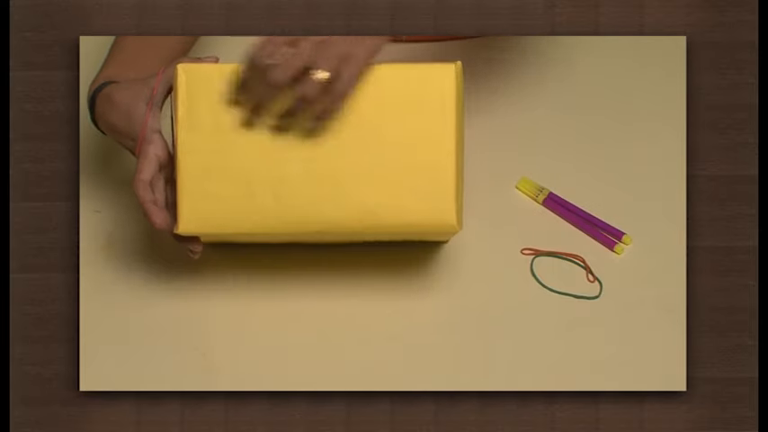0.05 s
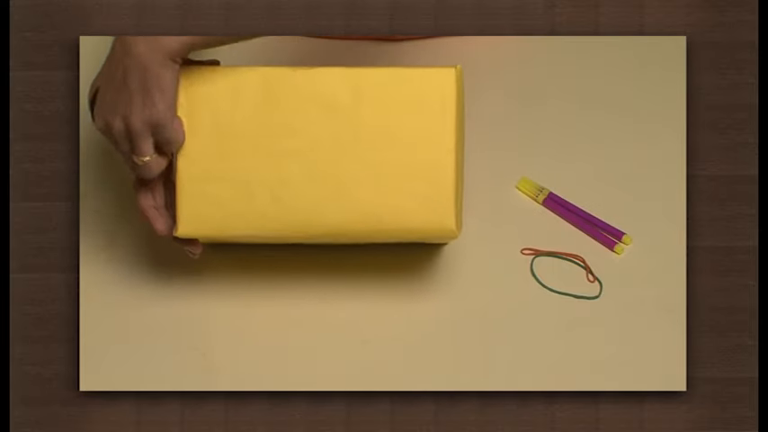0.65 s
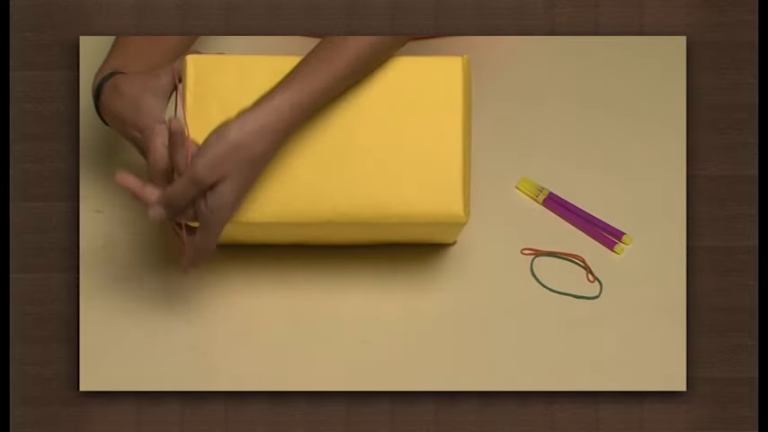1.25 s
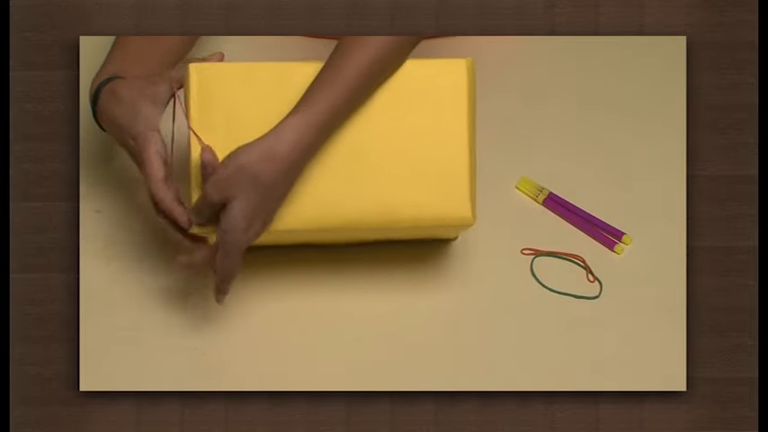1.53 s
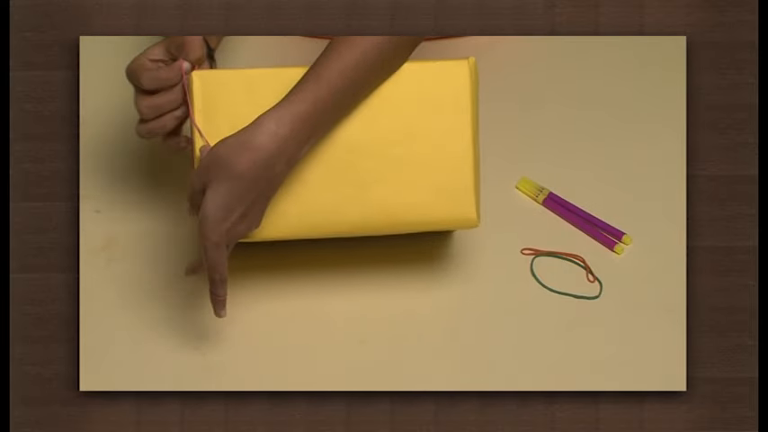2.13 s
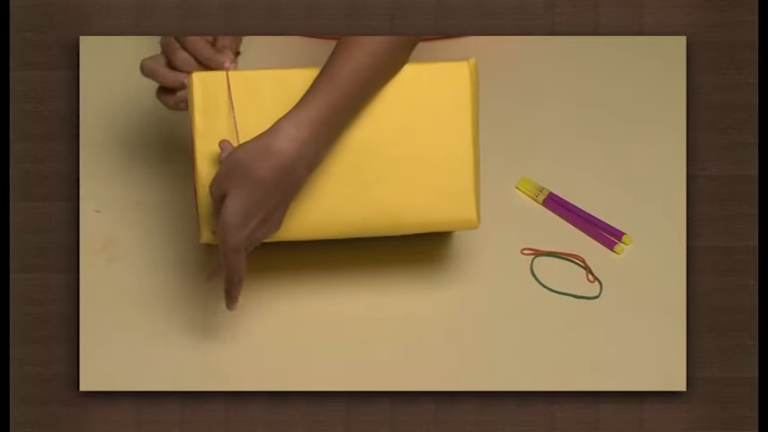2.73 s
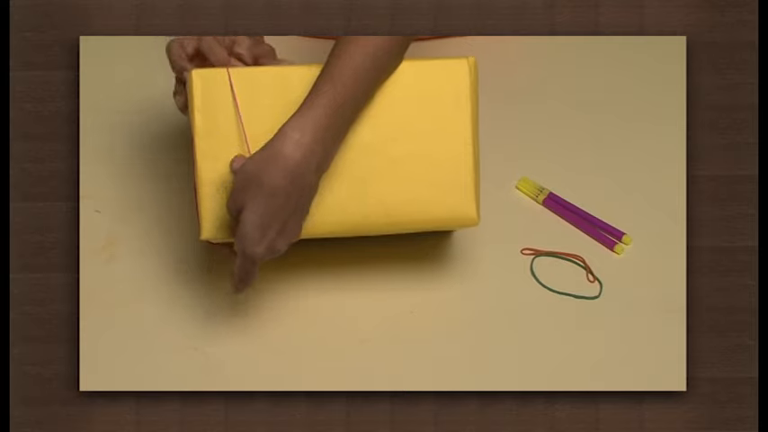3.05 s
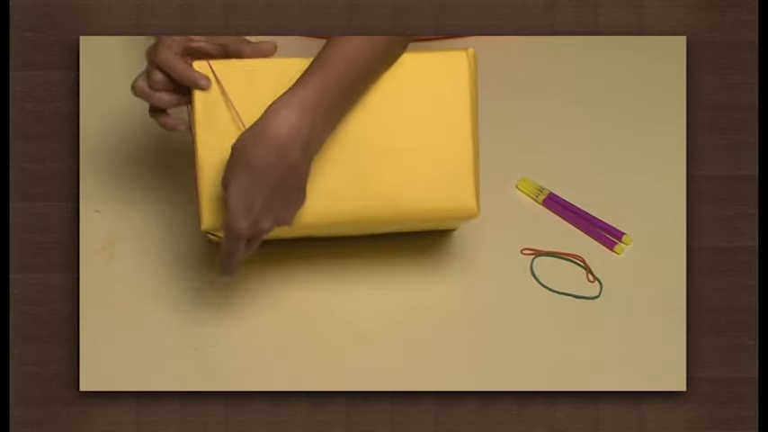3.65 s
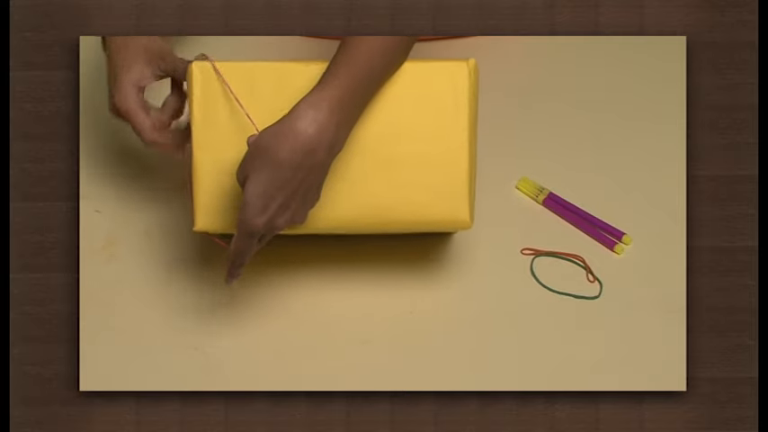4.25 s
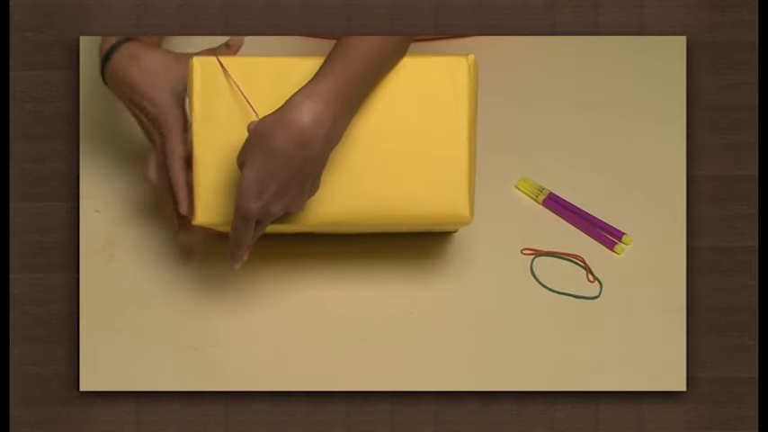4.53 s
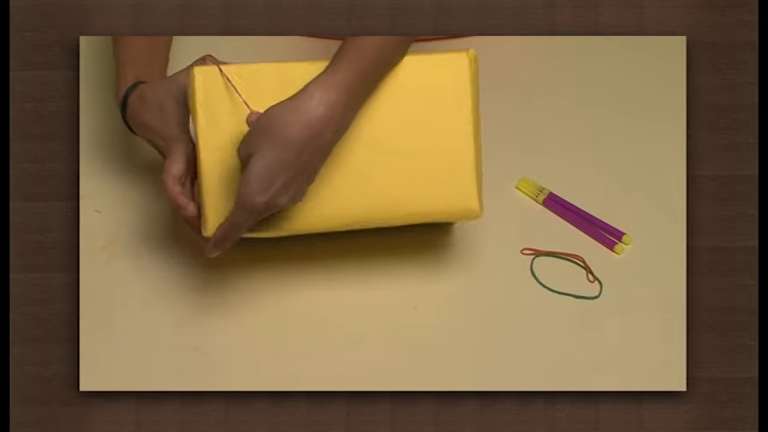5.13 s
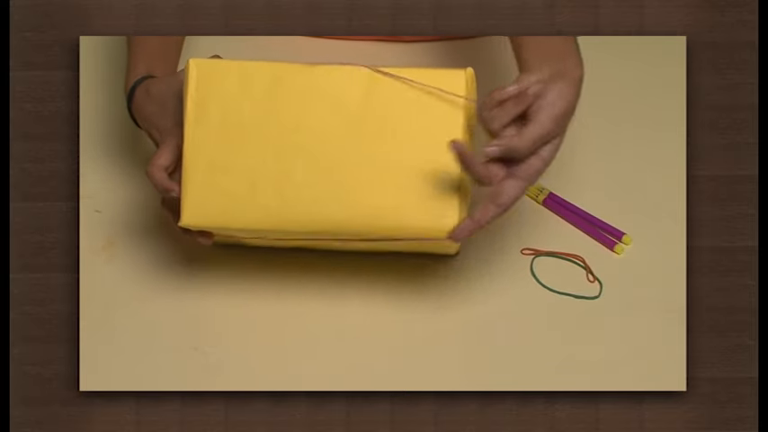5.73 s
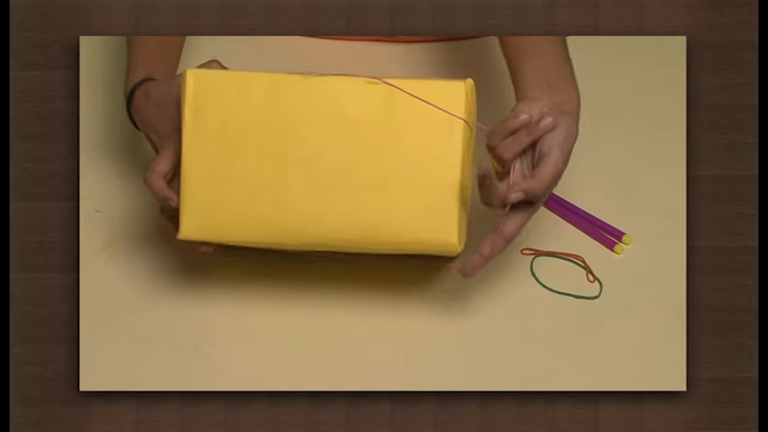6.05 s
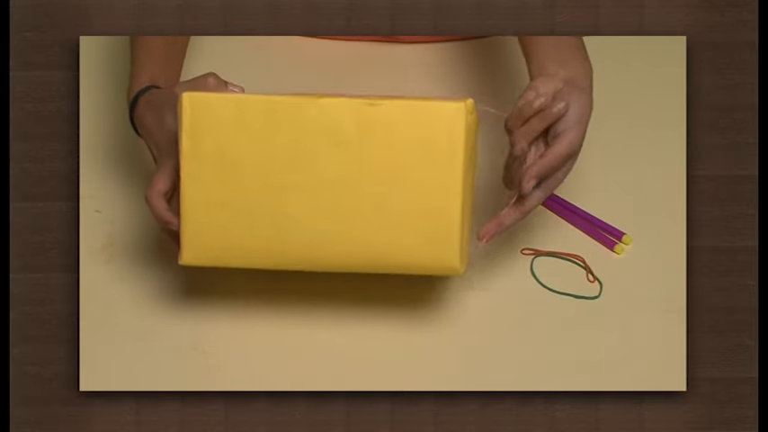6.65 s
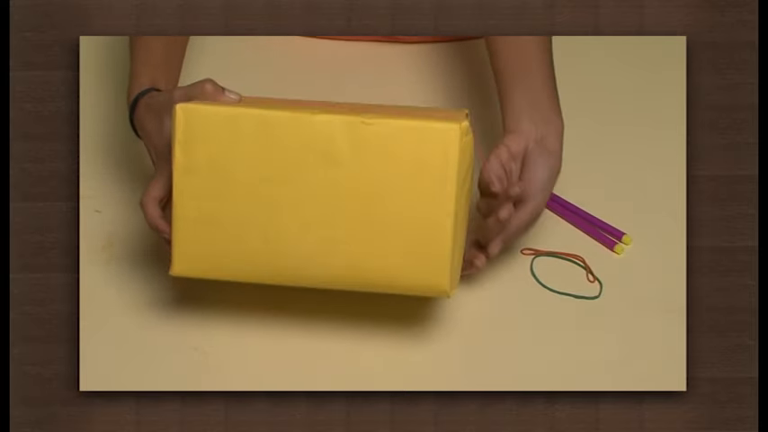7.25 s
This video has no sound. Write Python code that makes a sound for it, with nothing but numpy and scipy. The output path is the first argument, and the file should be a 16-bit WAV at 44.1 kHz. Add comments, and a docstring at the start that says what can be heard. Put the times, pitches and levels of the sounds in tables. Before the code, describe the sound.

A faint fan hum and soft air fill a small, damped room throughout. All the handling is close and in the right channel only. Fingers first brush lightly over a paper-wrapped cardboard box. At about 1.7 seconds a rubber band gives a sharp double snap, with a hollow knock and brief twang. Rubbing and light ticks continue, and the box drones softly as it is pushed along the table. Another snap and twang come at 2.8, followed by small rubbery creaks until 3.2. From 3.2 to 4.7 the paper hisses and rasps more busily, among crisp clicks and several snaps. At 5.5 comes a strong twang with a snap and a short shove of the box. Between 6 and 6.8 snaps and twangs follow quickly, strongest near 6.4 and 6.75, each knocking the box. Soft rustles and a few ticks close at about 7.4 seconds.

```python
"""Rubber band round a wrapped box

Two hands stretch a rubber band round a paper-wrapped cardboard box on a table. Fingers hiss and
rasp over the paper, and the box drones as it is pushed. The band creaks, twangs and snaps; each
snap cracks on the paper and knocks the hollow box. A close microphone puts all this on the right
channel; the left holds only the quiet room with a humming fan."""
import sys
import numpy as np
from scipy import signal
from scipy.fft import rfft, irfft
from scipy.io import wavfile

SR = 44100
rng = np.random.default_rng(int(sys.argv[2]) if len(sys.argv) > 2 else 0)


def transcribe(u):
    """Save the signal u as a 16-bit wav file named by the first command-line argument.

    u: samples, shape (n,) or (channels, n), limited to [-1, 1]; the rate is SR.
    q: integer samples, one column per channel.
    """
    v = np.clip(np.atleast_2d(u).T, -1, 1)
    q = np.round(v * 32767).astype(np.int16)
    wavfile.write(sys.argv[1], SR, q)


N = 325899
TIME = np.arange(N) / SR

# Steady noise in both channels, on the left only and on the right only: f/Hz, level/dB per Hz
ROOM_AIR = [(20, -111), (43, -82), (70, -103.5), (230, -91), (290, -81), (380, -99), (580, -92.5),
            (700, -98), (1000, -100), (2000, -109), (5000, -122), (16000, -135)]
LEFT_NOISE = [(20, -107), (100, -92), (400, -104), (2000, -114), (5000, -118), (13300, -119), (14200, -140),
              (16000, -150)]
RIGHT_NOISE = [(20, -84), (50, -78), (75, -78.5), (100, -75), (135, -80), (230, -90.5), (330, -89.5),
               (500, -96.5), (1000, -101), (2000, -108), (5000, -111), (16000, -112)]
# Tones of the fan: f/Hz, left level/dB, right level/dB
FAN_TONES = [(98.2, -79, -56.5), (195.5, -90, -60), (297.4, -69, -63.5)]

# A mode is a pitch at which a thing likes to ring; t60 is the time it takes to fade by 60 dB.
# Modes of the hollow box: f/Hz, level/dB, t60/s
BOX_MODES = [(113.4, -15, 0.071), (146, -6, 0.087), (206, 4, 0.054), (245, 4.5, 0.076), (330.4, 3, 0.098),
             (380, -5, 0.1), (447.7, -1.5, 0.064), (504, 1.5, 0.062), (570, 5, 0.035), (657, -1.5, 0.056),
             (774, 0, 0.059), (916, 6, 0.037), (1013, -3, 0.074), (1185, -1, 0.027), (1635, 0, 0.044)]
# Modes of the tight paper and of the creaking cardboard edge: f/Hz, width/Hz, level/dB
PAPER_MODES = [(2690, 120, -3.5), (2984, 23, -3.5), (3240, 70, -22), (3830, 33, -12.5), (3940, 64, -4.5),
               (4250, 160, -10.5), (4930, 300, -13), (5510, 115, -15.5), (6000, 27, -16.5)]
EDGE_MODES = [(530, 37, 5), (750, 56, -2), (865, 25, 6), (1730, 58, -7.5), (2430, 360, -20)]
# Tone colours of rubbed paper, the pushed box and a crack on the paper: f/Hz, level/dB
HISS_COLOUR = [(200, 6), (800, -5.5), (1600, -4), (2600, -5.5), (4000, -4), (6000, -2.5), (9000, 0),
               (13500, 0), (16000, -9)]
DRONE_COLOUR = [(70, -8), (120, 13.5), (220, -4.5), (400, 4), (650, -7.5), (900, -2), (1300, -20.5),
                (2000, -11), (3500, -43.5), (7000, -44.5)]
CRACK_COLOUR = [(100, -4), (400, 2.5), (900, -1), (1300, -3.5), (1800, 0.5), (2300, 0), (2800, 0.5),
                (4000, 2.5), (5500, 2.5), (7500, 3), (10000, 2), (14000, -0.5), (16000, -16)]

# A hand rubs the paper: start t/s, length/s, hiss level/dB, growth over the stroke/dB
HAND_RUBS = [(0.60, 0.31, -62, -8), (1.18, 0.11, -50, -9.5), (1.47, 0.33, -53, 1.5),
             (1.825, 0.058, -44, -3.5), (1.94, 0.26, -51, -4), (2.26, 0.23, -57, 12.5),
             (2.57, 0.52, -57.5, 4), (3.15, 0.075, -52, 16), (3.325, 0.055, -55, 7), (3.43, 0.3, -52.5, 16),
             (3.82, 0.353, -57.5, 7), (4.15, 0.16, -49, 7), (4.35, 0.31, -45, -9.5), (4.765, 0.12, -53, -5),
             (4.97, 0.295, -55, 5), (5.25, 0.25, -53.5, 21.5), (5.53, 0.13, -57.5, 1),
             (5.69, 0.16, -49.5, -1), (6.11, 0.17, -50, 3), (6.54, 0.055, -62, 7), (6.875, 0.15, -50, 0.5),
             (7.04, 0.19, -61, 16.5), (7.33, 0.06, -52, 0)]
# The box is pushed along the table: start t/s, length/s, drone level/dB, growth over the stroke/dB
BOX_PUSHES = [(1.2, 0.081, -61, 2), (1.78, 0.33, -57, -10), (2.47, 0.054, -46, -19), (2.78, 0.23, -53, 4),
              (3.1, 0.13, -53.5, 5), (3.5, 0.23, -53, 7), (3.86, 0.17, -56, 1), (4.15, 0.15, -51, 7),
              (4.39, 0.37, -53.5, -17), (5.19, 0.19, -51, -6), (5.49, 0.07, -36.5, -12),
              (5.69, 0.16, -53, -2), (6.1, 0.35, -55, 12), (6.88, 0.49, -57.5, -4)]
# Quick slides on the paper: middle t/s, relative hiss level/dB, swell width/s, rasp f/Hz, rasp level/dB
QUICK_SLIDES = [(0.321, -49, 0.042, 3820, -59.5), (0.619, -54, 0.025, 3880, -63),
                (0.718, -53, 0.032, 3830, -56), (1.187, -49.5, 0.027, 3700, -56),
                (1.545, -54, 0.0073, 2150, -46), (2.414, -49, 0.081, 5270, -52.5),
                (2.783, -52, 0.012, 2900, -34), (2.966, -43.5, 0.046, 2160, -54.5),
                (3.524, -36, 0.041, 3750, -50), (3.678, -38.5, 0.047, 3880, -44.5),
                (3.756, -38.5, 0.029, 6360, -49), (3.965, -36.5, 0.048, 7000, -60),
                (4.287, -31, 0.033, 3580, -42.5), (4.312, -33.5, 0.01, 3080, -45),
                (4.379, -40.5, 0.053, 3600, -45), (4.469, -45, 0.013, 3150, -30),
                (4.483, -36, 0.027, 3550, -43), (4.595, -40, 0.028, 3920, -43),
                (5.333, -41.5, 0.079, 7140, -51.5), (6.116, -47, 0.023, 9600, -40.5),
                (6.189, -36, 0.011, 2440, -39), (6.25, -62, 0.025, 7340, -49),
                (6.326, -48.5, 0.02, 2680, -50), (6.402, -54, 0.034, 4200, -44),
                (6.776, -63, 0.033, 3300, -47.5), (6.835, -48, 0.03, 8800, -59)]
# The tight band creaks over an edge: middle t/s, level/dB, swell width/s, slip rate/Hz
BAND_CREAKS = [(2.862, -46, 0.027, 190), (2.92, -45.5, 0.075, 330), (3.062, -52, 0.033, 205),
               (3.189, -48.5, 0.049, 230), (3.938, -48, 0.021, 196)]
# The plucked band twangs: t/s, level/dB, start f/Hz, end f/Hz, t60/s
BAND_TWANGS = [(1.762, -30, 350, 322, 0.065), (2.776, -27.5, 328, 332, 0.15), (3.896, -27, 269, 337, 0.051),
               (4.393, -36.5, 320, 449, 0.22), (5.509, -19.5, 485, 396, 0.085), (5.53, -39, 136, 141, 0.33),
               (5.72, -43, 255, 278, 0.37), (6.013, -36.5, 264, 251, 0.25), (6.103, -42, 131, 117, 0.18),
               (6.181, -40, 252.5, 245, 0.21), (6.383, -21, 510, 440, 0.059), (6.511, -41, 402, 279, 0.16),
               (6.556, -45.5, 150, 91.6, 0.16)]
# Fingers and band tick lightly on the paper:
# t/s, relative crack level/dB, skid/ms, treble tilt/dB per octave, box ring level/dB
LIGHT_TICKS = [(1.215, -39, 4, 4, -52), (1.5415, -45, 7.4, -4.5, -34), (1.7688, -33.5, 1, -4, -49),
               (1.952, -44, 13, -1, -62), (2.0986, -31, 2.1, -2, -63), (2.4718, -29, 4, -1, -53),
               (2.6635, -38.5, 3.7, -1.5, -50), (2.6936, -41.5, 5.9, -2.5, -48), (2.756, -27, 2.3, 2, -43),
               (2.98, -29, 1.75, 4.5, -68), (3.116, -34.5, 3.4, 0.5, -44.5), (3.2333, -27, 3.2, -1, -42),
               (3.2802, -36.5, 2.9, -3, -74), (3.383, -25, 1.7, 2, -51), (3.507, -14.5, 0.83, 10, -56),
               (3.5591, -32.5, 1.66, -9, -52), (3.7279, -26, 1.6, -1.5, -46),
               (3.7677, -28, 1.74, -0.5, -46), (3.8039, -30, 1.5, -3.5, -55),
               (3.8492, -21.5, 1.16, -6.5, -43), (3.879, -23, 1.9, -2.5, -54), (3.923, -40.5, 5.4, -5, -62),
               (4.062, -46.5, 4.3, -8, -57), (4.1858, -21.5, 1.8, 7, -48), (4.4192, -29, 3.4, 11, -54),
               (4.4654, -30, 1.1, -3, -52), (4.512, -20.5, 0.75, 4, -47), (4.5317, -31, 1.6, 8, -52.5),
               (4.5942, -28.5, 1.9, 2, -44), (4.608, -31, 1.3, 0, -43.5), (4.679, -27, 0.83, -3, -44),
               (4.6962, -29.5, 1.32, -1, -53), (5.112, -48, 3, -9, -43), (5.235, -46, 9.9, -12, -44.5),
               (5.7052, -34, 14, -2.5, -49), (6.0225, -35, 2.6, -3, -39), (6.3205, -35, 1.4, -14.5, -44.5),
               (6.376, -24.5, 2.6, -0.5, -52), (6.4757, -47, 7.7, -4.5, -50), (6.509, -43, 5.1, -5, -52),
               (6.729, -30, 2.6, -0.5, -38), (6.7426, -14, 2.8, 4, -31.5), (6.944, -39, 2, -3, -52.5),
               (7.1015, -37, 2, -25, -54.5), (7.1262, -26, 0.93, 3, -47.5)]
# The band snaps against the box: t/s, relative crack level/dB, skid/ms, treble tilt/dB per octave,
# box ring level/dB, struck panel f/Hz, thump level/dB, gap between bounces/ms
BAND_SNAPS = [(1.7319, -14, 12.3, 0, -25.5, 310, -21, 16.7), (1.7422, -9.5, 1.75, -2.5, -33, 900, -54, 12),
              (2.1549, -27.5, 2.5, -3, -42.5, 350, -49, 9.1),
              (2.7743, -21.5, 4.5, -1, -37.5, 344, -41.5, 6.3),
              (3.238, -14.5, 1.82, 5, -37.5, 483, -44, 2.4), (3.6776, -20, 2.5, 2, -47.5, 500, -36.5, 2.4),
              (3.8975, -20, 0.87, -1.5, -47, 275, -56, 1.4), (4.2532, -24, 2.05, -1.5, -41, 392, -34.5, 33),
              (4.3909, -19.5, 2.5, 0.5, -36, 380, -45, 6), (4.4695, -31, 2.8, -4.5, -49, 400, -34, 4.2),
              (5.4786, -17.5, 3, -2.5, -43.5, 500, -40, 6.1),
              (5.51, -23.5, 10.5, -0.5, -26, 470, -38, 10.9),
              (5.7526, -27.5, 1.7, 1.5, -41.5, 540, -53, 7.2),
              (6.0080, -23.5, 2.7, -2, -34.5, 370, -32, 6.8), (6.1024, -22, 2.8, 2, -39.5, 307, -54, 7.6),
              (6.1812, -25.5, 3.2, 1, -38, 500, -54, 7), (6.38, -14.5, 6.3, -1, -26.5, 477, -26, 6.7),
              (6.5098, -23, 1.74, 0.5, -33, 370, -32, 2.9),
              (6.7454, -15.5, 4.9, -1.5, -27.5, 386, -22.5, 4.9)]


def from_db(db):
    """Turn decibels into a factor to multiply by."""
    return 10 ** (np.asarray(db) / 20)


def rms_one(x):
    """Scale a signal so that its average strength (rms) is one."""
    return x / np.sqrt(np.mean(x ** 2) + 1e-20)


def add(track, s, sound):
    """Mix a sound into the track, starting at s seconds."""
    at = max(round(s * SR), 0)
    track[at:at + len(sound)] += sound[:N - at]


def dying(t, t60):
    """A fade that falls 60 dB in t60 seconds."""
    return np.exp(-np.log(1000) * t / t60)


def swell(width_s):
    """A bell-shaped rise and fall that lasts three widths in all."""
    return np.exp(-np.linspace(-3, 3, int(3 * max(width_s, .003) * SR)) ** 2)


def drift(rate_hz):
    """A smooth random wander, about one in size; a higher rate wanders faster."""
    r = np.exp(-80 * np.pi * rate_hz / SR)
    slow = signal.lfilter([1], [1, -2 * r, r * r], rng.standard_normal(N // 40 + 2002))[2000:]
    return np.interp(np.arange(N) / 40, np.arange(len(slow)), rms_one(slow))


def coloured(x, points, size=4096):
    """Shape the lows and highs of a sound along a curve of (f/Hz, level/dB) points."""
    hz, db = np.transpose(points)
    grid = np.maximum(np.arange(size // 2 + 1) * SR / size, 1)
    cepstrum = irfft(np.log(from_db(np.interp(np.log(grid), np.log(hz), db))))
    cepstrum[1:size // 2] *= 2   # folded so that the filter never rings before the sound arrives
    cepstrum[size // 2 + 1:] = 0
    return signal.fftconvolve(x, irfft(np.exp(rfft(cepstrum))))[:len(x)]


def resonate(x, modes):
    """Let a sound ring a set of (f/Hz, width/Hz, level/dB) modes and add them up."""
    out = 0
    for hz, width, db in modes:
        r = np.exp(-np.pi * width / SR)
        feedback = [1, -2 * r * np.cos(2 * np.pi * hz / SR), r * r]
        out = out + from_db(db) * (1 - r * r) / 2 * signal.lfilter([1, 0, -1], feedback, x + 1e-18)
    return out


def background(waver=0.3, phase_wander=0.62):
    """Room air and a wavering fan reach both channels; each channel also has its own noise."""
    air, left, right = [coloured(rng.standard_normal(N) * np.sqrt(SR / 2), colour)
                        for colour in (ROOM_AIR, LEFT_NOISE, RIGHT_NOISE)]
    out = np.array([air + left, air + right])
    for hz, left_db, right_db in FAN_TONES:
        loudness = 1 + waver * drift(4.2)
        hum = loudness * np.sin(2 * np.pi * hz * TIME + phase_wander * drift(6.0))
        out += from_db([[left_db], [right_db]]) * rms_one(hum)
    return out


def room(x, echo_db=-19, t60=0.13, build_s=0.0069, dull_hz=7000):
    """A small, damped room adds a faint and duller echo."""
    t = np.arange(SR // 2) / SR
    tail = rng.standard_normal(len(t)) * dying(t, t60) * (1 - np.exp(-t / build_s))
    tail = signal.sosfilt(signal.butter(1, dull_hz, fs=SR, output="sos"), tail / np.linalg.norm(tail))
    return x + from_db(echo_db) * signal.fftconvolve(x, tail)[:N]


def paper(x):
    """The wrapping adds its own ring to whatever scrapes or hits it."""
    return x + resonate(x, PAPER_MODES)


def friction(grain_db, catch_db, catch_hz):
    """Countless fibres touch, some harder than others, in clumps as the surface catches and lets go."""
    noise = rng.standard_normal(N)
    roughness_db = grain_db * rng.standard_normal(N) + catch_db * drift(catch_hz)
    return rms_one(noise * from_db(roughness_db))


def crinkle(per_s=40, spread_db=4.5, t60=0.003):
    """Now and then a crease in the paper gives way with a tiny tick."""
    gives_way = rng.random(N) < per_s / SR
    sizes = from_db(spread_db * np.minimum(rng.exponential(1, N), 3))
    fades = signal.lfilter([1], [1, -dying(1 / SR, t60)], gives_way * sizes + 1e-18)
    return rng.standard_normal(N) * fades


def shifting_colour(x, patchy_db=3, rate_hz=14, sharpness=9, share_db=-3):
    """As the fingers move, the paper under them favours now one pitch, now another."""
    out = x
    for hz in np.geomspace(1800, 14500, 14):
        band = resonate(x, [(hz, hz / sharpness, share_db)])
        out = out + band * (from_db(patchy_db * drift(rate_hz)) - 1)
    return out


def strokes(rows, attack_s=0.024, release_t60=0.21):
    """Loudness of hand movements: each starts quickly, grows or fades evenly, and gently stops."""
    out, t = np.zeros(N), np.arange(SR) / SR
    for start, length, db, growth_db in rows:
        held = from_db(db + growth_db * (np.minimum(t / length, 1) - .5))
        release = dying(np.maximum(t - length, 0), release_t60)
        add(out, start, held * np.minimum(t / attack_s, 1) * release)
    return out


def settling(rustle_db=-41, shudder_db=-14):
    """Loudness of the paper's rustle and the box's shudder as they die down after each snap."""
    rustle, shudder = np.zeros((2, N))
    t = np.arange(SR // 2) / SR
    for s, crack_db, _, _, ring_db, *_ in BAND_SNAPS:
        add(rustle, s, from_db(crack_db + rustle_db) * dying(t, t60=0.26))
        add(shudder, s, from_db(ring_db + shudder_db) * dying(t, t60=0.22))
    return rustle, shudder


def rubbing(slide_db=-1, slide_drone_db=-12, crinkle_db=3):
    """The paper hisses and the box drones as hands slide and push, and briefly after each snap."""
    slides = np.zeros(N)
    for mid, db, width_s, *_ in QUICK_SLIDES:
        stroke = swell(width_s)
        add(slides, mid - len(stroke) / SR / 2, from_db(db + slide_db) * stroke)
    rustle, shudder = settling()
    hiss_level = np.hypot(strokes(HAND_RUBS), rustle)   # hypot adds up the power of two noises
    drone_level = np.hypot(strokes(BOX_PUSHES), shudder)
    skin = friction(grain_db=1.0, catch_db=2.5, catch_hz=92) + from_db(crinkle_db) * crinkle()
    hiss = rms_one(shifting_colour(paper(coloured(skin, HISS_COLOUR))))
    drone = rms_one(coloured(friction(grain_db=7.0, catch_db=3.0, catch_hz=36), DRONE_COLOUR))
    return (hiss * np.hypot(hiss_level, slides)
            + drone * np.hypot(drone_level, from_db(slide_drone_db) * slides))


def rasping(sharpness=3.8, skid_hz=4020, skid_db=-16):
    """Quick slides and the skids of the band rasp: rough friction rings at a pitch of its own."""
    out = np.zeros(N)
    rough = friction(grain_db=6.5, catch_db=5.5, catch_hz=450)
    slides = [(mid, width_s, hz, db) for mid, _, width_s, hz, db in QUICK_SLIDES]
    skids = [(s + ms / 1000, ms / 1000, skid_hz, db + skid_db) for s, db, ms, *_ in BAND_SNAPS]
    for mid, width_s, hz, db in slides + skids:
        stroke = swell(width_s)
        start = mid - len(stroke) / SR / 2
        mode = [(hz, hz / sharpness, 0)]
        grains = rough[int(start * SR):][:len(stroke)]
        rasp = rms_one(resonate(resonate(grains, mode), mode))
        add(out, start, from_db(db) * stroke * rasp)
    return out


def creaks(jitter=0.16, uneven_db=3, scrape=0.061):
    """Rubber sticks and slips at an uneven rate, and each slip rings the cardboard edge."""
    out = np.zeros(N)
    for mid, db, width_s, slip_hz in BAND_CREAKS:
        stroke = swell(width_s)
        gaps = np.exp(jitter * rng.standard_normal(256))
        slip_at = (np.cumsum(gaps) * SR / slip_hz).astype(int)
        slip_at = slip_at[slip_at < len(stroke)]
        slips = scrape * rng.standard_normal(N)[:len(stroke)]
        slips[slip_at] += from_db(uneven_db * rng.standard_normal(256))[:len(slip_at)]
        creak = rms_one(resonate(slips, EDGE_MODES))
        add(out, mid - len(stroke) / SR / 2, from_db(db) * stroke * creak)
    return out


def twangs(glide_s=.026, db_per_octave=-5, mellow_hz=540, thin_hz=190, attack_s=0.0032):
    """The plucked band sounds like a string, gliding to a new pitch as its tension changes."""
    out, t = np.zeros(N), np.arange(SR // 3) / SR
    harmonic = np.arange(1, 7)[:, None]
    for s, db, start_hz, end_hz, t60 in BAND_TWANGS:
        pitch_hz = end_hz + (start_hz - end_hz) * np.exp(-t / glide_s)
        phase = 2 * np.pi * np.cumsum(pitch_hz) / SR
        weight = from_db(db_per_octave * np.log2(harmonic))
        weight /= 1 + (harmonic * end_hz / mellow_hz) ** 4   # high overtones are weak
        weight /= 1 + (thin_hz / (harmonic * end_hz)) ** 2   # a small box gives out low notes poorly
        tone = np.sum(weight * np.sin(harmonic * phase), axis=0)
        add(out, s, from_db(db) * rms_one(tone) * dying(t, t60) * (1 - np.exp(-t / attack_s)))
    return out


def thump(t, table_hz=120, puff_s=0.00091, puff_db=-4, shake_hz=42, shake_db=-14):
    """The box pushes a puff of air and bumps the table, which also gives a deep, slow shake."""
    puff = from_db(puff_db) * t / puff_s * np.exp(1 - t / puff_s) * np.cos(t / puff_s / 2)
    bump = np.sin(2 * np.pi * table_hz * t) * dying(t, t60=0.024)
    shake = from_db(shake_db) * np.sin(2 * np.pi * shake_hz * t) * dying(t, t60=0.072)
    return puff + bump + shake


def box_ring(t, panel_hz, focus_db=8, focus_octaves=0.19, scatter_db=2):
    """A blow rings every mode of the box, most of all those of the panel that it lands on."""
    hz, db, t60 = np.transpose(BOX_MODES)[:, :, None]
    nearness = np.exp(-(np.log2(hz / panel_hz) / focus_octaves) ** 2)
    strength = from_db(db + focus_db * nearness + scatter_db * rng.standard_normal(hz.shape))
    strength[1::2] *= -1   # neighbouring modes swing in opposite directions
    ring = np.sum(strength * dying(t, t60) * np.sin(2 * np.pi * hz * t), axis=0)
    return ring / np.sqrt(np.mean(ring[t < 0.011] ** 2))   # the first 11 ms set the level


def crack(t, skid_s, tilt, grain_db=4, rise_s=0.00017, flutter_db=-3.5, rattle_db=3, rattle_s=0.00128):
    """Rubber skids over paper in a clump of tiny slips; a longer skid leaves a longer rattle."""
    slips = rng.standard_normal(len(t)) * from_db(grain_db * rng.standard_normal(len(t)))
    slips = rms_one(coloured(slips, [(1500, -2 * tilt), (6000, 0), (16000, np.sqrt(2) * tilt)], 256))
    skid = (1 - np.exp(-t / rise_s)) * np.exp(-(t / skid_s) ** 4)
    energy = np.sum(skid ** 2)
    skid *= 1 + (0.0026 / skid_s) ** 4 * np.exp(-(t / 0.00056) ** 2)   # short skids let go all at once
    skid *= np.sqrt(energy / np.sum((skid * slips) ** 2))   # back to the same energy
    rattle = np.interp(t / rattle_s, np.arange(256), rng.standard_normal(256))
    stirred = np.tanh(skid_s / 0.0029) * (1 - np.exp(-t / skid_s))   # brief ticks barely stir the sheet
    settle_t60 = min(0.016 + 12 * skid_s, 0.11)
    flutter = from_db(flutter_db + rattle_db * rattle) * stirred * dying(t, settle_t60)
    return slips * (skid + flutter)


def contacts(lid_hz=502, tick_thump_db=-4, bounce_loss_db=10.5, bounce_skid_ms=2.7):
    """List every tick on the lid, every snap, and the two ever weaker bounces after each snap."""
    rows = [(*tick, ring_db, lid_hz, ring_db + tick_thump_db) for *tick, ring_db in LIGHT_TICKS]
    for s, crack_db, skid_ms, tilt, ring_db, panel_hz, thump_db, gap_ms in BAND_SNAPS:
        rows.append((s, crack_db, skid_ms, tilt, ring_db, panel_hz, thump_db))
        for bounce in (1, 2):
            s += gap_ms / 1000
            loss = bounce_loss_db * bounce
            short_ms = min(skid_ms, bounce_skid_ms / bounce)
            rows.append((s, crack_db - loss, short_ms, tilt, ring_db - loss, panel_hz, thump_db - loss))
    return rows


def snaps_and_ticks(crack_gain_db=-1):
    """Each contact cracks on the paper, rings the hollow box and gives a low thump."""
    cracks, knocks = np.zeros((2, N))
    t = np.arange(SR // 5) / SR
    for s, crack_db, skid_ms, tilt, ring_db, panel_hz, thump_db in contacts():
        add(cracks, s, from_db(crack_db + crack_gain_db) * crack(t, skid_ms / 1000, tilt))
        add(knocks, s, from_db(ring_db) * box_ring(t, panel_hz) + from_db(thump_db) * thump(t))
    return paper(coloured(cracks, CRACK_COLOUR)) + knocks


def scene():
    """The background fills both channels; hands, band and box are heard on the right only."""
    stereo = background()
    stereo[1] += room(snaps_and_ticks() + twangs() + creaks() + rubbing() + rasping())
    return stereo


def record(dry, cutoff_hz=16200):
    """Clip any peak beyond full scale and cut off the very highest treble."""
    lowpass = signal.ellip(10, .1, 80, cutoff_hz, fs=SR, output="sos")
    return signal.sosfilt(lowpass, np.clip(dry, -1, 1))


dry = scene()
out = record(dry)
transcribe(out)
```